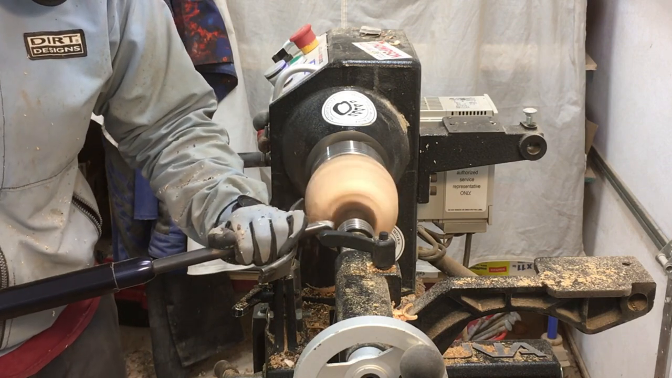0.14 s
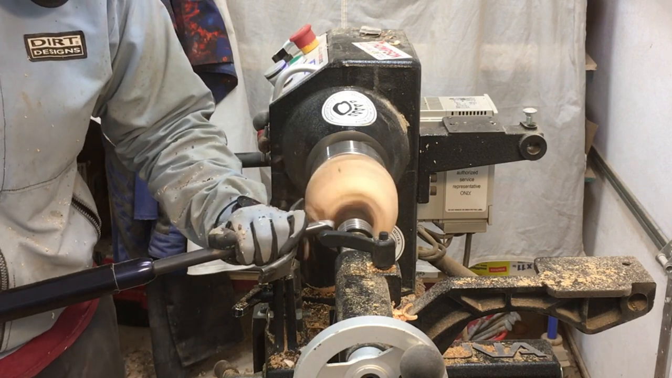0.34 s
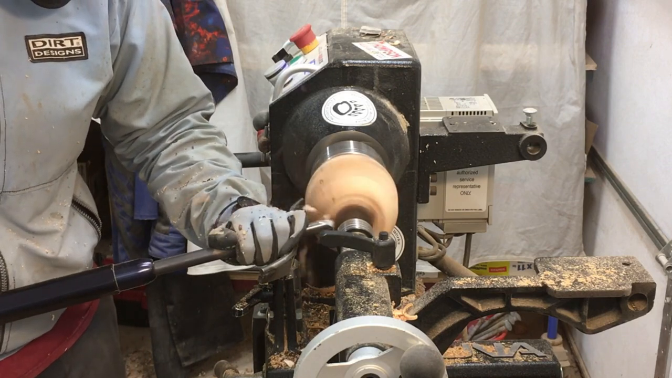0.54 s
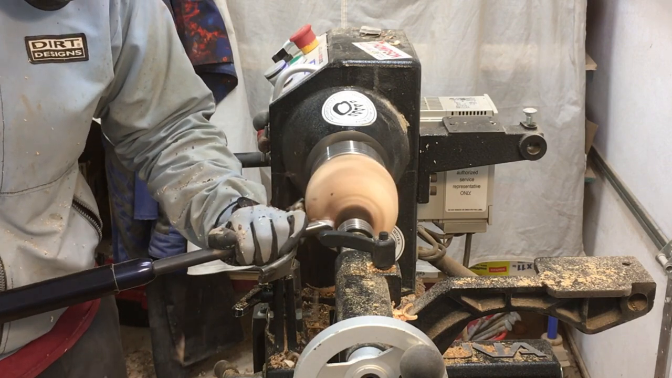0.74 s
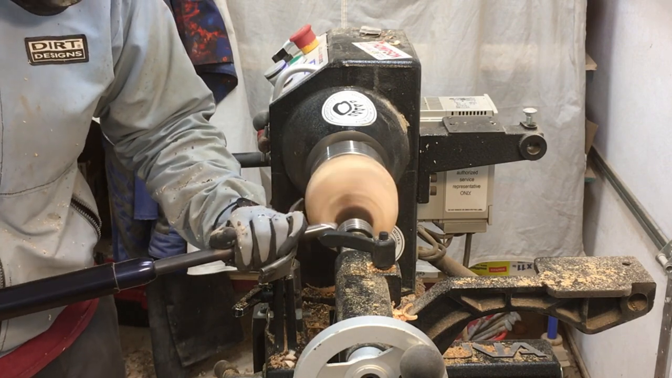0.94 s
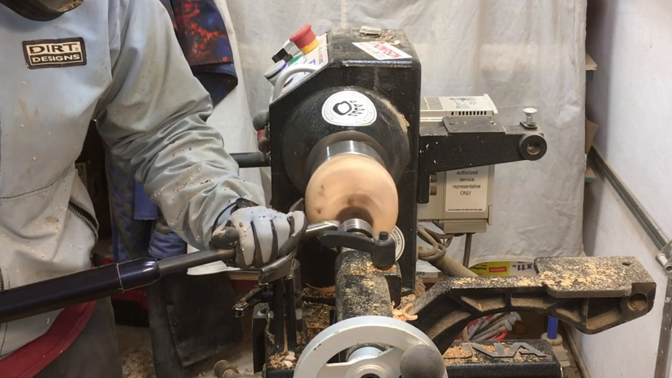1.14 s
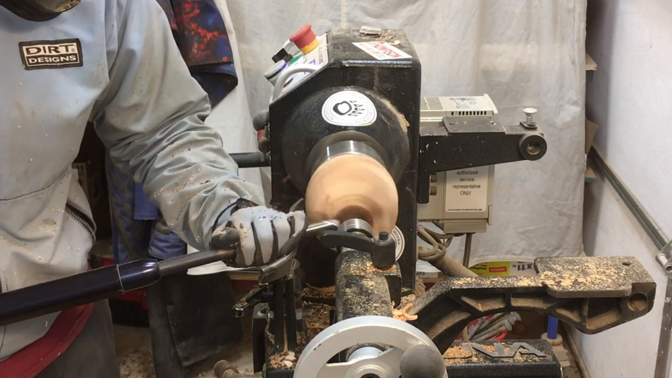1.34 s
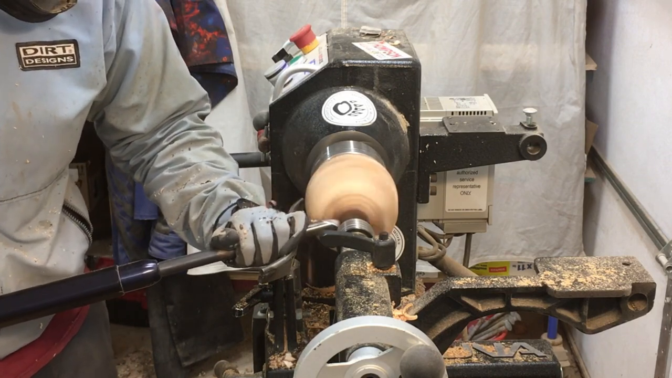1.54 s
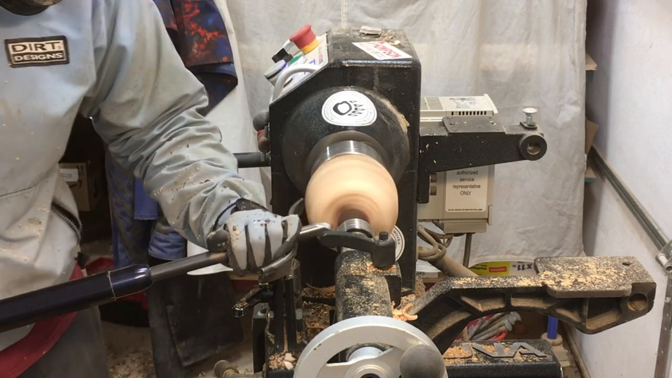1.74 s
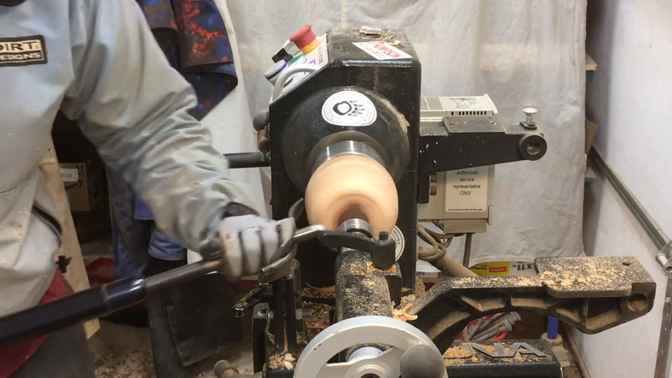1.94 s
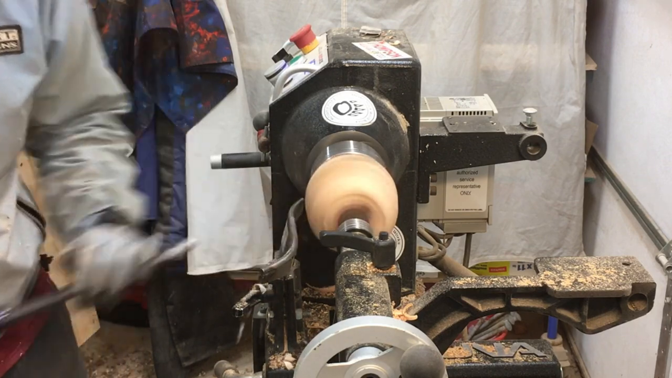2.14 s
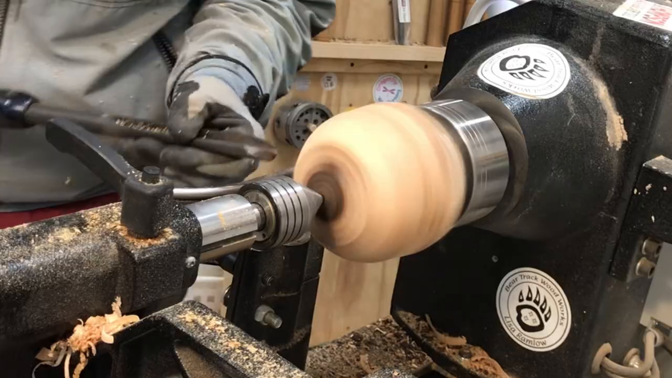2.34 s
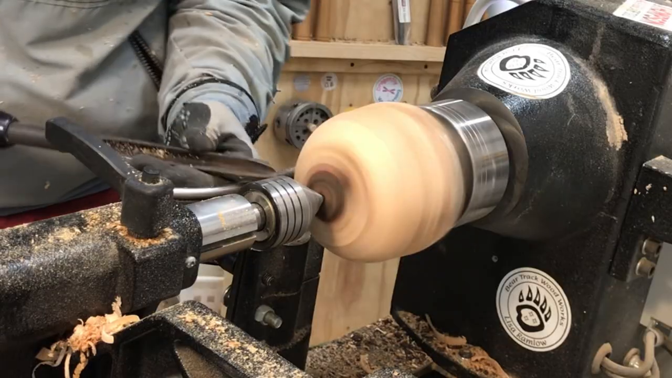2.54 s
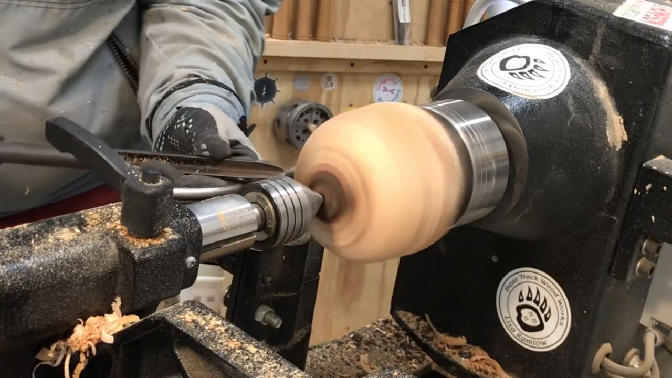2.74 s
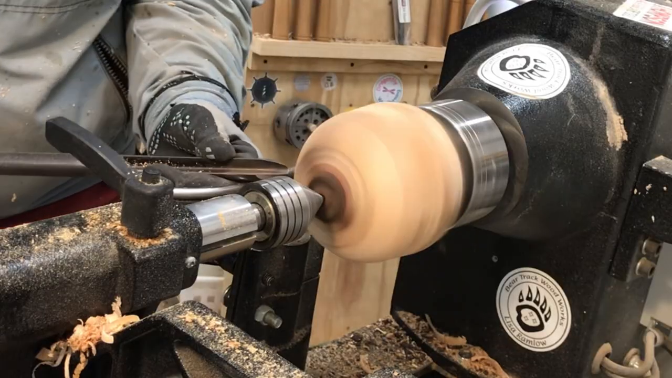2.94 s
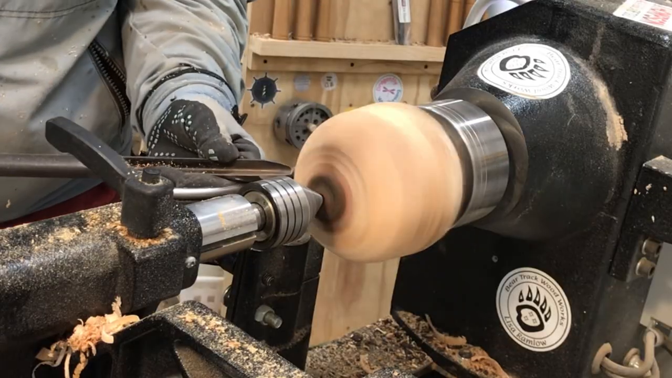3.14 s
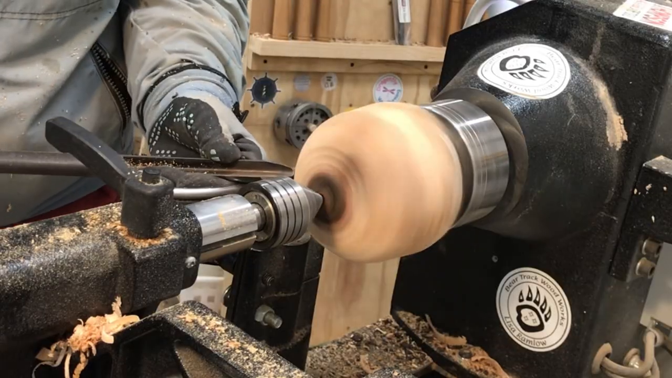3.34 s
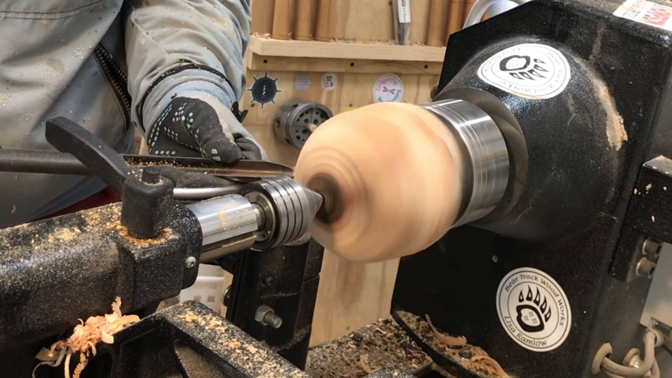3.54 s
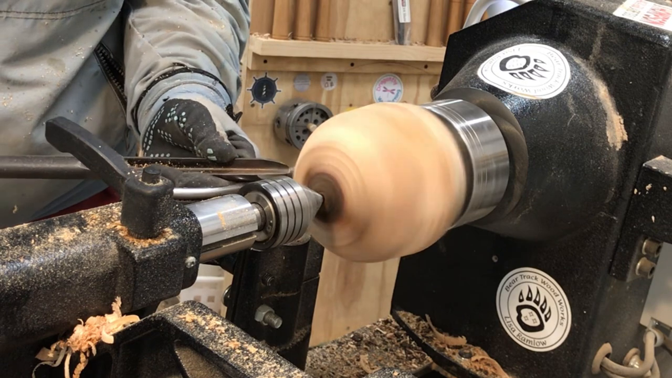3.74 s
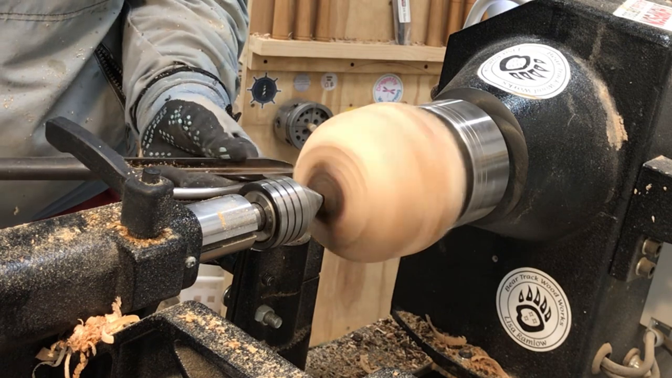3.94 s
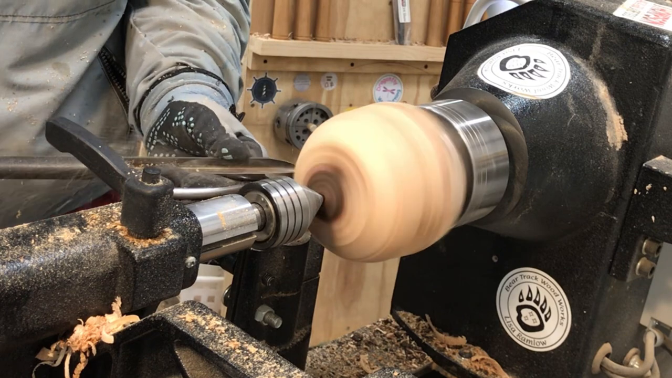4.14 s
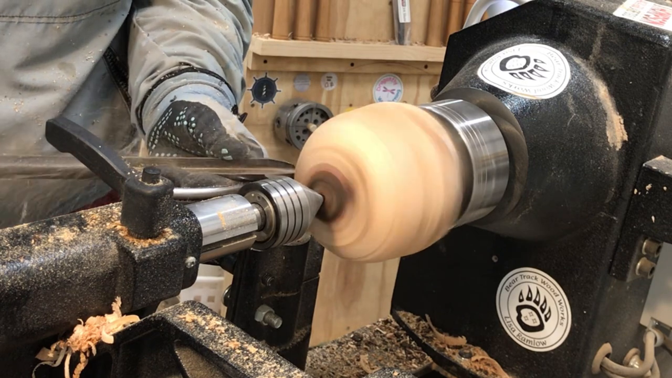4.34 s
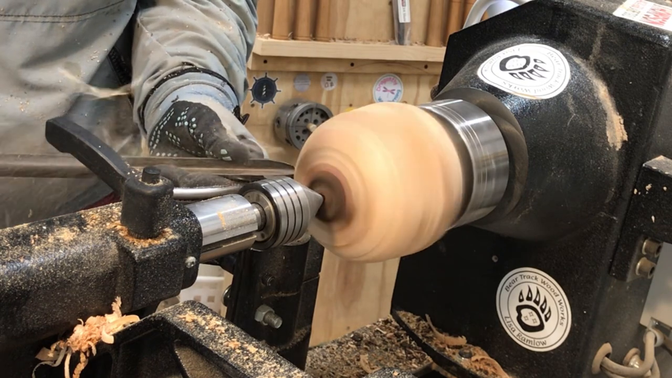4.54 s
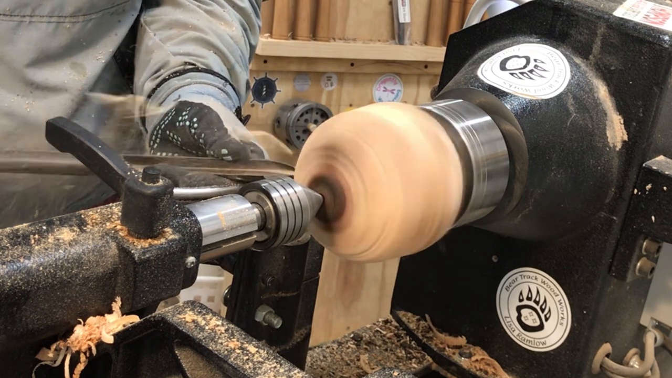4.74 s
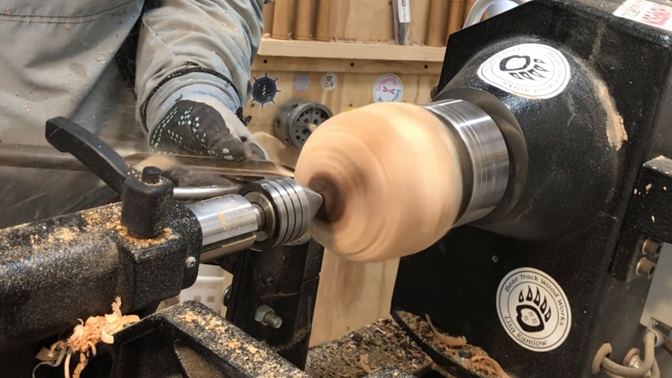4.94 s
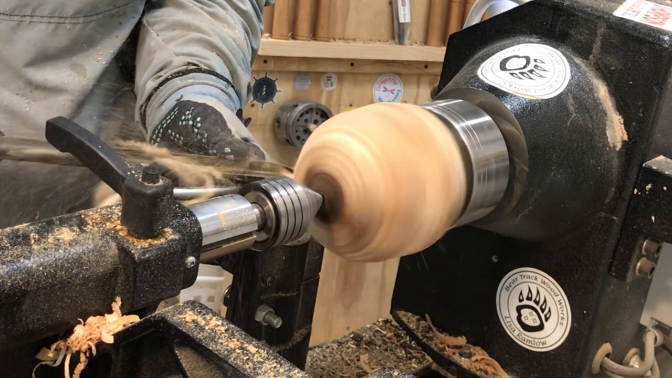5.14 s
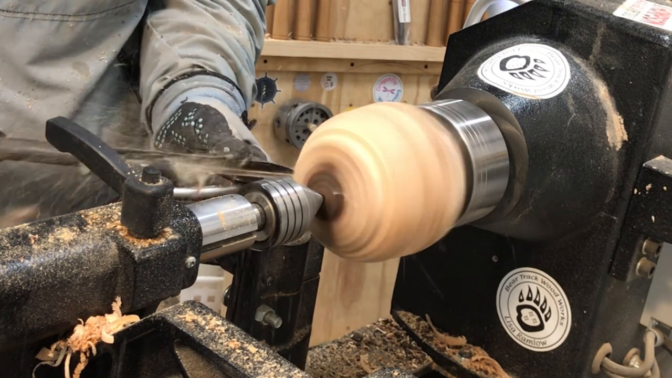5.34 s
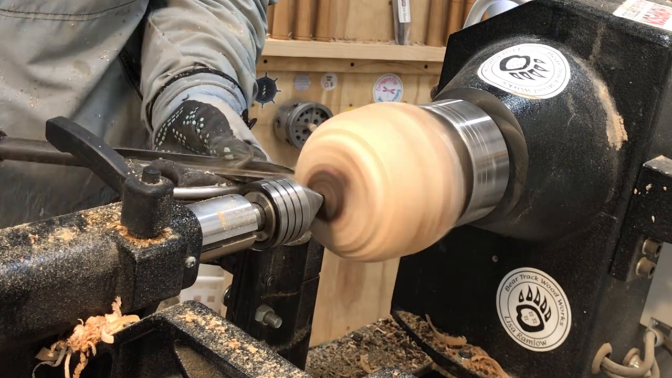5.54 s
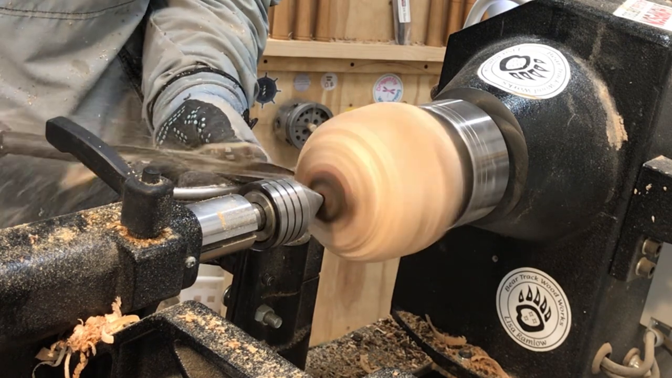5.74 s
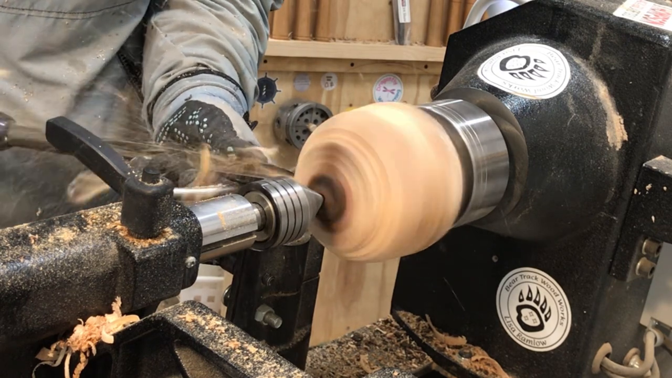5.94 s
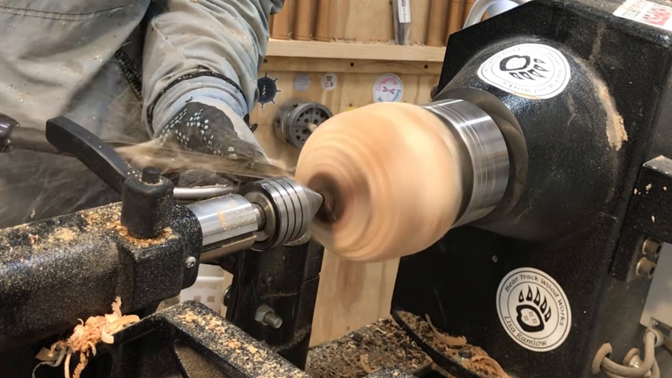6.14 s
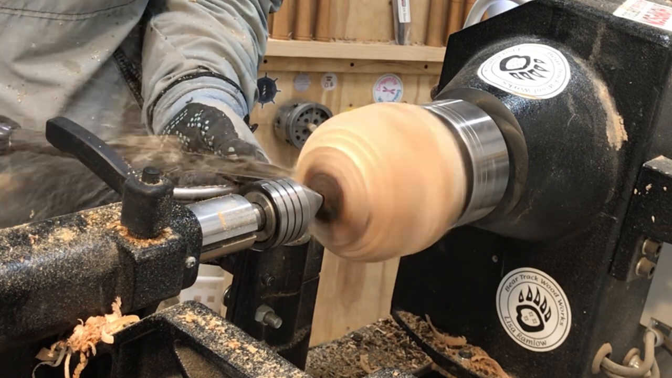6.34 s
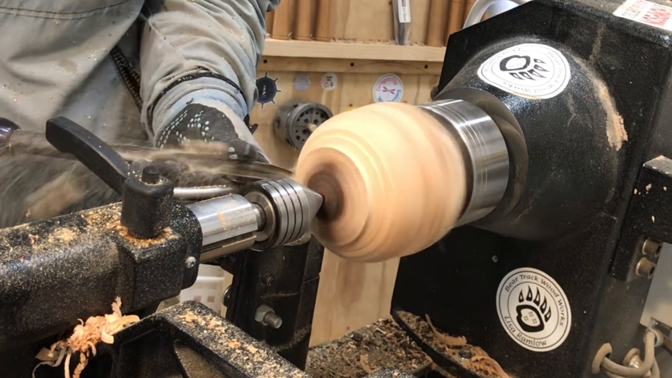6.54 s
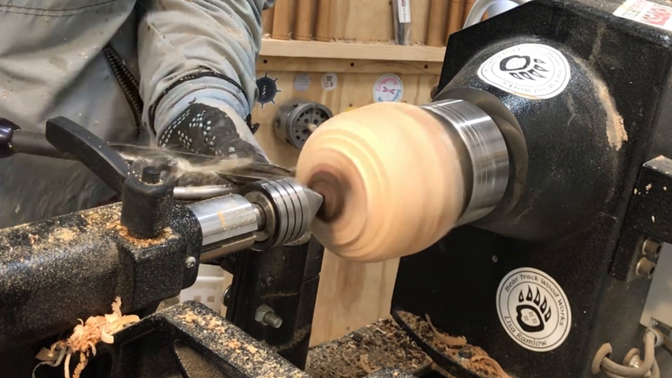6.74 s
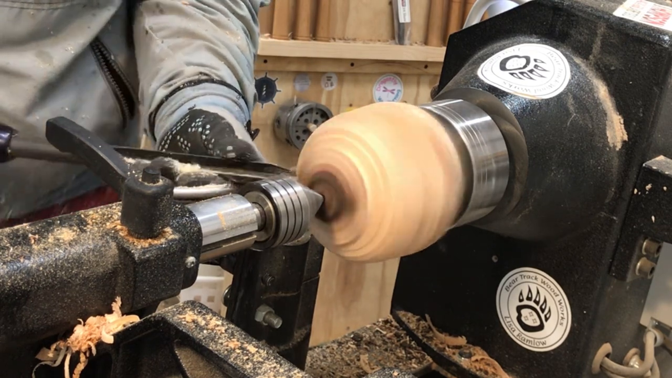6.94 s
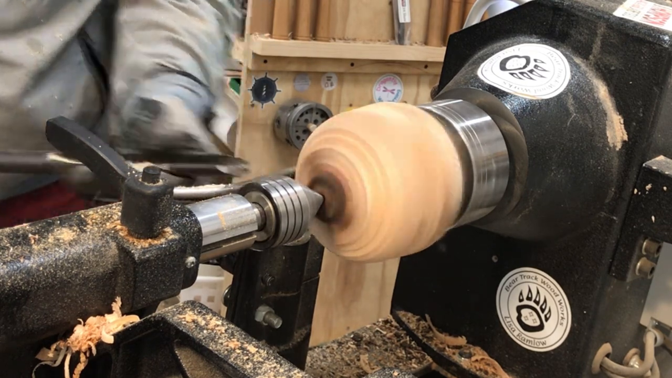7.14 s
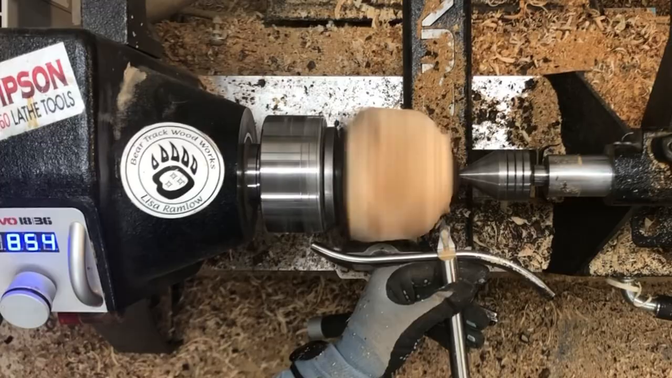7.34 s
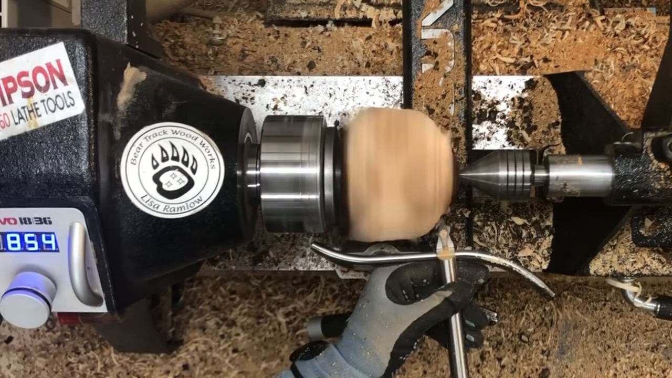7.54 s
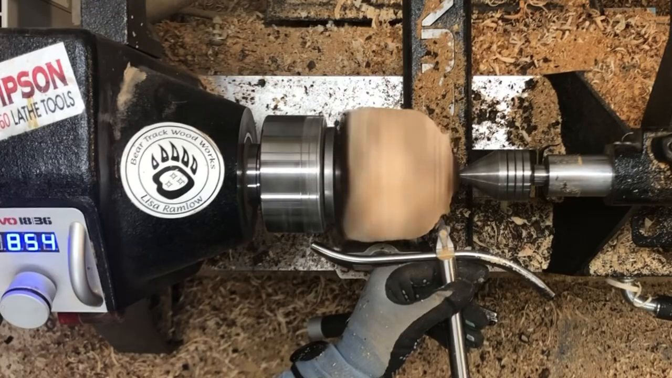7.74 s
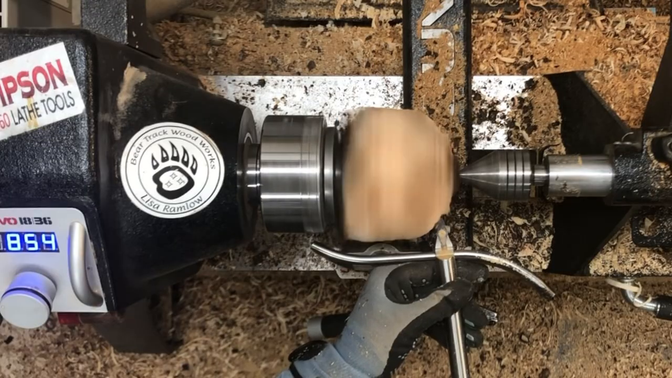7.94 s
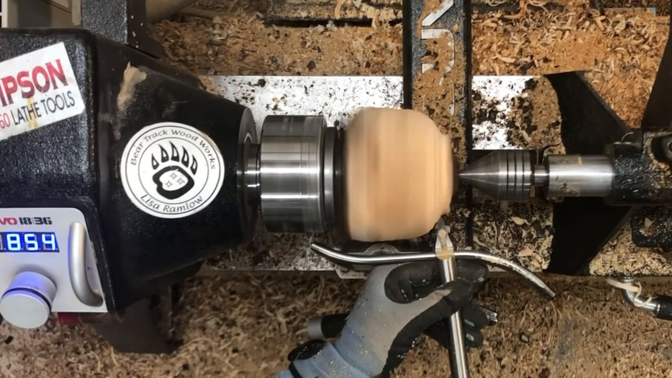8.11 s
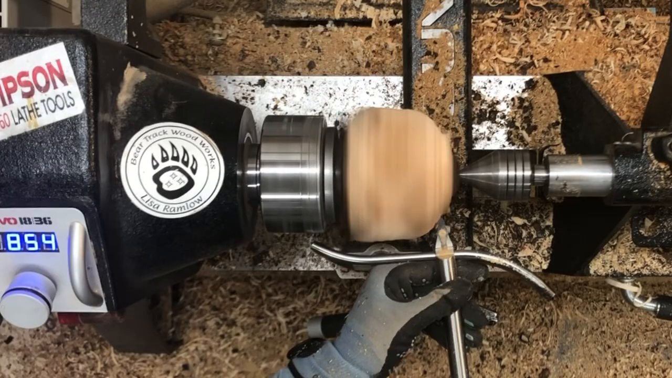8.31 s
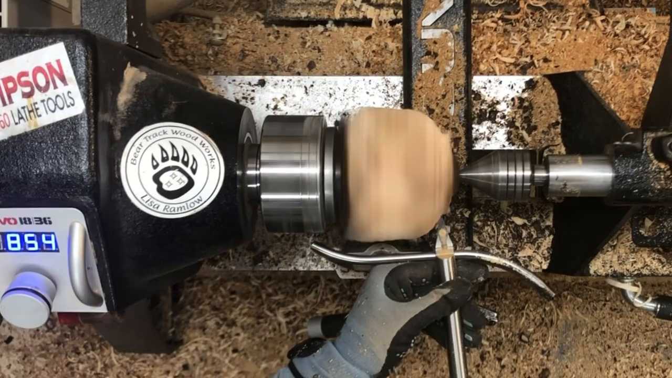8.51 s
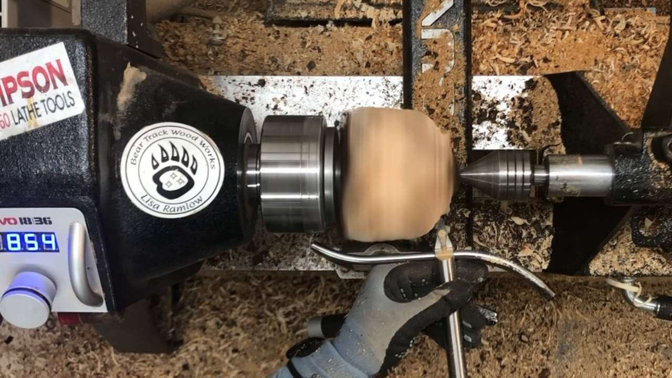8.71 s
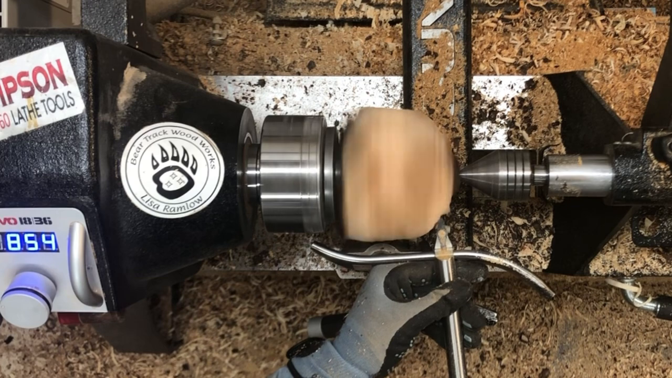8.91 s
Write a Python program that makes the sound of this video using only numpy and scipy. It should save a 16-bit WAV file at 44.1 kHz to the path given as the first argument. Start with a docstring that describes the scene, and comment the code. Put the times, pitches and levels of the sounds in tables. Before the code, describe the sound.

A gouge cuts spinning wood in dull rattling bursts, then longer hissing passes, over a softly running lathe in a workshop.

```python
"""A workshop: a wood lathe spins a small bowl blank at about 860 rpm.
A gouge meets the end grain twice a turn: tearing fibres hiss; wood, tool and lathe ring.
Two dull cuts, a knock on the tool rest, two long bright cuts, then a skim touching once a turn.
A sleeve rustles between cuts. Behind it all the motor runs and its inverter whines near 10 kHz."""
import sys
import numpy as np
from scipy import signal
from scipy.fft import rfft, irfft
from scipy.io import wavfile

SR = 44100
rng = np.random.default_rng(int(sys.argv[2]) if len(sys.argv) > 2 else 0)


def master(y):
    """Save y as 16-bit WAV."""
    cut = np.clip(np.atleast_2d(y).T, -1, 1)
    pcm = np.round(cut * 32767)  # scale
    wavfile.write(sys.argv[1], SR, pcm.astype(np.int16))


N = 395577
TAPS = 16384

# gouge feed per cut: t/s, force/dB, shaving hiss/dB
FIRST_CUT = [(0, -24, -29), (0.13, -21, -35), (0.27, -17, -35.5), (0.42, -18.5, -32), (0.56, -23, -33),
             (0.7, -30.5, -33.3), (0.78, -35.5, -36)]
SECOND_CUT = [(1.046, -26, -37), (1.085, -25, -42.5), (1.24, -23, -33), (1.33, -15.5, -36.5),
              (1.43, -19.5, -34), (1.51, -18.5, -37), (1.6, -43, -59)]
THIRD_CUT = [(4.001, -35.5, -33.5), (4.09, -30, -28.5), (4.35, -29.5, -25), (4.68, -29, -22.5),
             (4.871, -25, -18), (5.12, -23.5, -15.5), (5.291, -22.5, -17.5), (5.42, -35, -33)]
FOURTH_CUT = [(5.517, -36.5, -27.5), (5.609, -26, -20.5), (5.799, -20.5, -17), (6.1, -19, -14.5),
              (6.349, -21.5, -17.5), (6.6, -26.5, -22.5), (6.85, -28.5, -25.6), (6.97, -41.5, -33.5)]
SKIM = [(7.85, -56, -46), (7.97, -45, -45.5), (8.35, -50, -47.2), (8.65, -54.5, -49.5), (8.97, -57, -49.5)]
CUTS = [FIRST_CUT, SECOND_CUT, THIRD_CUT, FOURTH_CUT, SKIM]

def feed(entry_s=0.0004, exit_s=0.012):
    """The edge enters fast and lifts out gently: force, shaving, contact gate 0-1."""
    t = seconds()
    force_db, shaving_db = in_time([row for cut in CUTS for row in cut])
    ramps = [np.minimum((t - cut[0][0]) / entry_s, (cut[-1][0] - t) / exit_s) for cut in CUTS]
    return force_db, shaving_db, np.clip(ramps, 0, 1).sum(axis=0)


# drive at each cut's peak: headstock/dB, its slope/(dB per dB of force), bed/dB, gouge ring/dB,
# hollow wood/dB re force, rasp/dB re force
SHAKING = [(-29.5, 0.74, -37.5, -29, -12, -4.5), (-27, 1.1, -35.5, -32, -10, -7.5),
           (-26, 1.77, -35, -25, -11, -5.5), (-26.5, 0.49, -32, -21, -10.5, -4),
           (-49, 1.5, -67.5, -50.5, -11, -5)]

def cutting(turns, force_db, shaving_db, touching, uneven_db=1.0):
    """Force drives blank and headstock, depth the bed, both the steel; the shaving hisses."""
    _, top_force_db, top_shaving_db = np.transpose([np.max(cut, axis=0) for cut in CUTS])
    push_db = force_db - per_cut(top_force_db)
    depth_db = shaving_db - per_cut(top_shaving_db)
    thrum_db, thrum_slope, bed_db, ring_db, hollow_db, rasp_db = map(per_cut, np.transpose(SHAKING))
    thrum, boom, hollow, rasp, ring, hiss = touching * from_db([
        thrum_db + thrum_slope * push_db,
        bed_db + 1.14 * depth_db,
        force_db + hollow_db + uneven_db * drift(per_s=16),  # harder and softer wood
        force_db + rasp_db + uneven_db * drift(per_s=16),
        ring_db + 0.79 * (push_db + depth_db),
        shaving_db])
    seat = contact(turns, depth_db)
    jolt, wood_catch, hiss_catch = catches()
    load = bites(seat, lag_s=0.0025, extra_rub_db=0.5, stretch=1.14)
    lathe = lathe_body(turns, thrum * load, boom * load, jolt)
    wood = blank(turns, hollow * load, rasp * load, wood_catch)
    body = from_db(-5) * workshop(lathe, wet_db=-4.5) + from_db(-3.5) * workshop(wood, wet_db=-4.5)
    chips = grit(grit_db=1.1, per_s=330)
    steel = gouge_ring(ring * chips * bites(seat, lag_s=0.001) + from_db(-9) * hiss_catch)
    spray = fibre_hiss(hiss * chips * bites(seat, extra_rub_db=-3, stretch=0.93) + hiss_catch)
    return body + from_db(-0.83) * workshop(steel, wet_db=1) + from_db(-2) * workshop(spray, wet_db=-15.5)


# edge seating per cut: high spot at edge t/s, full-depth bite/turns, full-depth rub/dB,
# opposite bite at entry/dB, at exit/dB, top octave of hiss at entry/dB, at exit/dB
CONTACT = [(.755, 0.05, -4, 1.5, -17, -7, -9.5), (1.051, 0.15, -12.5, -5.5, 11.5, -9, -3),
           (4.05, 0.075, -7, -0.5, -.5, 5.5, -3.5), (5.522, .1, -10, -0.5, -19, 0, -4.5),
           (7.869, 0.024, -40, -32, -33, -8, -8)]
IDLE_TURNS_PER_S, SAG_TURNS_PER_S, DEEP_CUT_DB = 14.42, 0.555, -15

def contact(turns, depth_db):
    """Deeper cuts bite longer and rub harder; the opposite bite changes mostly late in a cut."""
    _, full_turns, full_rub_db, entry_db, exit_db, _, _ = np.transpose(CONTACT)
    late = per_cut(np.zeros(len(CUTS)), np.ones(len(CUTS))) ** 3.3
    opposite_db = per_cut(entry_db) + late * per_cut(exit_db - entry_db)
    bite_turns = per_cut(full_turns) * from_db(0.6 * depth_db)
    rub_db = per_cut(full_rub_db) + 0.45 * depth_db
    return turns, bite_turns, opposite_db, rub_db


def spindle_turns(shaving_db, touching):
    """Blank angle, whole where the high spot meets the edge; cutting power slows it."""
    turns_per_s = IDLE_TURNS_PER_S - SAG_TURNS_PER_S * touching * from_db(shaving_db - DEEP_CUT_DB) ** 2
    turns = np.cumsum(turns_per_s) / SR
    high_spots = np.interp(np.transpose(CONTACT)[0], seconds(), turns)
    return turns - per_cut(np.unwrap(2 * np.pi * (high_spots % 1)) / (2 * np.pi))


def bites(seat, lag_s=0, extra_rub_db=0, stretch=1):
    """Force of mean power 1: end grain strikes twice a turn, the bevel rubs between."""
    turns, bite_turns, opposite_db, rub_db = seat
    turns = turns - lag_s * IDLE_TURNS_PER_S
    width = np.maximum(bite_turns * stretch, 0.01)
    high, opposite = (np.exp(-0.5 * (((turns + shift) % 1 - 0.5) / width) ** 2) for shift in (0.5, 0))
    opposite_power, rub_power = from_db(opposite_db) ** 2, from_db(rub_db + extra_rub_db) ** 2
    mean_power = np.sqrt(2 * np.pi) * width * (1 + opposite_power) + rub_power
    return np.sqrt((high + opposite_power * opposite + rub_power) / mean_power)


# edge catches: t/s, headstock drive/dB, wood drive/dB, hiss drive/dB
CATCHES = [(0.054, -29, -29, -38), (0.114, -29, -14.5, -30), (0.254, -30, -33, -45),
           (.755, -46.5, -36, -37), (.922, -60, -56, -43), (.984, -36, -36.5, -39),
           (1.016, -33.5, -36, -38.5), (1.052, -27, -30, -30), (1.119, -15.5, -15.5, -24),
           (1.157, -10, -11.5, -10), (1.259, -27, -21, -28), (1.397, -17.5, -22, -32),
           (3.422, -75, -70, -53), (3.491, -43.5, -40.5, -35), (3.56, -49, -38, -30),
           (4.007, -52, -51, -30.5), (4.955, -34, -36, -16), (5.004, -46, -10.5, -34),
           (5.453, -32, -33, -21.5), (5.488, -46, -37, -31), (5.523, -39.5, -34, -36),
           (6.933, -28.5, -37, -22.5), (7.003, -48, -39, -21)]

def catches():
    """The edge catches: burst envelopes for headstock, wood and hiss."""
    at_s, thrum_db, wood_db, hiss_db = np.transpose(CATCHES)
    return (bursts(at_s, thrum_db, rise_s=0.0016, fall_s=0.016),
            bursts(at_s, wood_db, rise_s=0.00081, fall_s=0.01),
            bursts(at_s, hiss_db, rise_s=0.003, fall_s=0.0036))


# wood spectra: f/Hz, level/dB
HOLLOW = [(250, -21), (400, 0), (480, 2.5), (700, 2.5), (1100, 2), (1300, -4.5), (1700, -4.5),
          (4000, -42.5)]
RASP = [(600, -31), (1200, -9.5), (1500, 2), (1900, 0.5), (2600, 3.5), (3050, -6), (4000, -9),
        (8000, -14.5)]
# blank resonances: f/Hz, width/Hz, lift/dB
WOOD_MODES = [(510, 26, 4), (537, 24, 7), (602, 24, 6), (790, 30, 4), (829, 34, 5), (942, 30, 8),
              (1020, 34, 5), (1073, 28, 6), (1161, 30, 8), (1480, 30, 3), (1637, 34, 9), (1770, 34, 6),
              (1910, 26, 9), (2208, 38, 5), (2398, 48, 9), (2700, 90, 3)]

def blank(turns, hollow, rasp, catch):
    """Bumps knock and tearing fibres rasp through the same wood modes."""
    splinters = grit(grit_db=1.4, per_s=160)
    bumps = surface(turns, memory=0.54) * grit(grit_db=2.5, per_s=600)
    knocking = bumps * (hollow * splinters + from_db(-7.5) * catch)
    rasping = tearing(grit_db=2.5, per_s=800) * (rasp * splinters + from_db(-2.5) * catch)
    return resonate(knocking, HOLLOW, WOOD_MODES) + resonate(rasping, RASP, WOOD_MODES)


def surface(turns, memory, per_turn=1024):
    """Wood bumps passing the edge, rms 1; each turn partly repeats the last."""
    fresh = rng.standard_normal((per_turn // 4, per_turn))
    rounds = signal.lfilter([np.sqrt(1 - memory ** 2)], [1, -memory], fresh, axis=0)
    place = (turns + len(rounds) // 4) * per_turn
    bumps = np.interp(place, np.arange(rounds.size), rounds.ravel())
    return bumps / bumps.std()


# fibre spectrum: f/Hz, level/dB
FIBRES = [(2000, -29), (4500, 0), (6000, -4), (7500, 1), (10000, 2.5), (13000, 3.5), (16000, 0)]
# edge resonances: f/Hz, width/Hz, lift/dB
EDGE_MODES = [(6470, 150, 6.2), (6960, 800, 4.9), (7420, 94, 2.5), (8500, 160, 9.9), (9040, 200, 5.8),
              (11100, 370, 3.5), (13200, 390, 4.3), (14200, 370, 4.5)]

def fibre_hiss(force, top_hz=10500):
    """Torn fibres hiss and chips crackle; thin shavings are brighter in the top octave."""
    fibres = near_echoes(resonate(tearing(grit_db=2.5, per_s=1700) * force, FIBRES, EDGE_MODES))
    top = signal.fftconvolve(fibres, signal.firwin(15, top_hz, fs=SR, pass_zero=False), mode="same")
    *_, entry_db, exit_db = np.transpose(CONTACT)
    top_gain = from_db(per_cut(entry_db, exit_db))
    spray = (fibres + (top_gain - 1) * top) / np.sqrt((1 + top_gain ** 2) / 2)
    return spray + from_db(-10.5) * crackle(force)


def crackle(force, per_s=2000, t60_cycles=25, pitches=14):
    """Chips snap off at random, each ringing briefly at its own pitch."""
    snaps = (rng.random(N) < per_s / SR) * rng.standard_normal(N)
    pitch_index, out = rng.integers(0, pitches, N), 0
    for k, hz in enumerate(np.geomspace(5000, 15000, pitches)):
        radius = from_db(-60 * hz / (t60_cycles * SR))
        gain = np.sqrt((1 - radius ** 2) / 2)
        poles = [1, -2 * radius * np.cos(2 * np.pi * hz / SR), radius ** 2]
        out += signal.lfilter([gain, 0, -gain], poles, snaps * force * (pitch_index == k) + 1e-18)
    return out / snaps.std()


# gouge spectrum: f/Hz, level/dB
GOUGE = [(2000, -22), (3000, -2), (3600, -0.5), (4500, 0), (5200, -2), (5800, -2.5), (8000, -27)]
# gouge resonances: f/Hz, width/Hz, lift/dB
GOUGE_MODES = [(3290, 28, 8), (3430, 60, 4), (4340, 120, 7), (4752, 130, 7), (4880, 160, 6), (5060, 120, 3)]

def gouge_ring(force):
    """Tearing fibres set the steel gouge ringing."""
    return resonate(tearing(grit_db=5, per_s=900) * force, GOUGE, GOUGE_MODES)


# lathe spectra: f/Hz, level/dB
BED = [(30, -59), (60, -28), (105, -14), (135, 2.5), (200, -3.5), (235, -5), (300, -19.5), (600, -61)]
HEADSTOCK = [(100, -48.5), (235, -9), (270, 2.5), (310, 6), (410, -4), (520, -41), (1000, -30.5)]
# lathe resonances: f/Hz, width/Hz, lift/dB
BED_MODES = [(146.7, 8.9, 6.5), (157.7, 4, 3.5), (158, 8.6, 0.5), (215, 150, 1)]
SPINDLE_MODES = [(293.8, 8.3, 14.1), (314.7, 38, 18.4), (365, 48, 3.7), (419, 18.5, 14.7)]

def lathe_body(turns, thrum, boom, jolt):
    """The cut shakes bed and spindle, nearly alike on every turn."""
    bumps = surface(turns, memory=0.845)
    bed = resonate(bumps * (boom + from_db(-17.5) * jolt), BED, BED_MODES)
    spindle = resonate(bumps * (thrum + jolt), HEADSTOCK, SPINDLE_MODES)
    return bed + from_db(-2.5) * spindle


# steel set on the tool rest: t/s, strike/dB
KNOCKS = [(1.8, -58), (1.892, -49.5), (1.997, -41.5), (2.597, -24.5), (7.089, -37)]
# crack spectrum: f/Hz, level/dB
REST_CRACK = [(60, -36), (200, -7), (400, -9), (700, -1), (1500, 0.5), (2600, -2.5), (4800, -1), (5800, -8),
              (7200, -8), (8500, -18), (16000, -30)]
# rest modes: f/Hz, level/dB, t60/s
REST_MODES = [(720, -7.5, 0.43), (1155, -4.5, 0.4), (1550, -5, 0.3), (2480, 7.5, 0.081), (2570, -1, 0.1),
              (3210, 4, 0.084), (3560, -15, 0.14), (4340, -3, 0.12), (5030, -18, 0.18), (4640, -17, 0.098),
              (5200, -11, 0.074), (6960, -6, 0.13), (7150, -18, 0.12)]

def tool_rest():
    """The tool strikes its rest: the crack, and the ring after it."""
    at_s, strike_db = np.transpose(KNOCKS)
    impacts = bursts(at_s, strike_db, rise_s=0.00037, fall_s=0.0097)
    crack = resonate(rng.standard_normal(N) * impacts, REST_CRACK)
    t, strikes = np.arange(TAPS) / SR, np.zeros(N)
    strikes[(at_s * SR).astype(int)] = from_db(strike_db)
    chime = sum(from_db(db - 60 * t / t60_s) * np.sin(2 * np.pi * (hz * t + rng.random()))
                for hz, db, t60_s in REST_MODES)
    return from_db(-1) * crack, from_db(-11.5) * signal.fftconvolve(strikes, chime)[:N]


# grip changes: start/s, end/s, peak/dB
GRIP_CHANGES = [(1.66, 2.36, -54), (7.07, 7.34, -51.5)]
# cloth spectrum: f/Hz, level/dB
CLOTH = [(200, 2), (1000, -5), (2000, 2.5), (4000, 2.5), (7000, -2), (10000, -14), (16000, -7)]

def sleeve():
    """Sleeve and glove rustle in one arc per change of grip."""
    envelope = np.zeros(N)
    for start_s, end_s, db in GRIP_CHANGES:
        progress = np.clip((seconds() - start_s) / (end_s - start_s), 0, 1)
        envelope += from_db(db) * np.maximum(np.sin(np.pi * progress), 0) ** 0.35
    return envelope * resonate(tearing(grit_db=0, per_s=190), CLOTH)


# motor, belt and bearing spectrum: f/Hz, level/dB
RUNNING = [(18, -51.5), (30, -17), (158, -1.5), (243, -7.5), (316, -2.5), (347, -4.5), (614, 0.5),
           (725, -2.5), (798, -2.5), (1630, -7), (2220, -8.5), (2680, -16.5), (3020, -9), (4310, -23.5),
           (8800, -16), (11400, -46), (19400, -120)]
# motor tones: f/Hz, rms/dB
MOTOR_TONES = [(132, -72), (146, -68), (316, -68), (619, -70.5), (780.6, -69), (1047, -69.5), (1098, -68.5),
               (1410, -73.5), (2148, -71), (3110, -75.5), (8651, -73)]

def motor(turns, running_db=-55.5, mains_on_s=7.33):
    """Bearing noise swells each turn over steady tones; mains hum enters late."""
    swell = from_db(running_db + 0.45 * np.cos(2 * np.pi * turns))
    running = swell * resonate(rng.standard_normal(N), RUNNING)
    hum = sum(tone(hz, db, waver_rad=0.26) for hz, db in MOTOR_TONES)
    mains = tone(hz=59.5, db=-69.5) * np.clip((seconds() - mains_on_s) / 0.03, 0, 1)
    return running + hum + mains


# carrier sidebands: offset/drive frequencies, level/dB
SIDEBANDS = [(-21, -71), (-19, -70), (-17, -70), (-15, -74), (-13, -71), (-11, -72), (-9, -72), (-5.5, -69),
             (-3, -53), (-1, -60), (0, -68), (1, -63), (3, -58), (5, -67), (6, -69), (9, -70), (11, -67),
             (13, -69), (15, -67), (17, -68), (21, -70), (25, -77)]
# switching noise spectrum: f/Hz, level/dB
DRIVE_HISS = [(7000, -14.5), (8700, -31), (9500, -18), (10100, -5), (10700, -1), (11200, -17),
              (11800, -7.5), (12600, -22), (14000, -18), (15300, -9), (16000, -39)]

def inverter(carrier_hz=10000, drive_hz=34.5):
    """Switching whine; inner sidebands stay in step, so it throbs twice per drive cycle."""
    whine = sum(tone(carrier_hz + k * drive_hz, db, scatter_cycles=min((k / 10) ** 2, 1))
                for k, db in SIDEBANDS)
    throb = from_db(2 * np.cos(4 * np.pi * drive_hz * seconds()))
    fizz = resonate(throb * rng.standard_normal(N), DRIVE_HISS)
    return from_db(-0.16) * whine + from_db(-60) * fizz


# echoes off blank, rest and headstock: delay/s, level/dB
NEAR_ECHOES = [(.00052, -17), (.00135, -22), (.0023, -9.5), (.0037, -31)]

def near_echoes(x):
    """Nearby hard surfaces comb the hiss; power is kept."""
    echoes = sum(from_db(db) * np.pad(x, (round(delay_s * SR), 0))[:N] for delay_s, db in NEAR_ECHOES)
    return (x + echoes) / np.sqrt(1 + sum(from_db(db) ** 2 for _, db in NEAR_ECHOES))


# room decay: f/Hz, t60/s
ROOM_T60 = [(125, 0.49), (400, 0.57), (1200, 0.47), (3500, 0.33), (8000, 0.33), (15000, 0.63)]

def workshop(x, wet_db):
    """Direct sound plus a diffuse tail decaying band by band; power is kept."""
    t, hz = np.arange(TAPS * 2) / SR, np.arange(TAPS + 1) * SR / (TAPS * 2)
    white = rfft(rng.standard_normal(len(t)))
    centres_hz, t60s = np.transpose(ROOM_T60)
    bands = [irfft(white * np.interp(hz, centres_hz, share)) for share in np.eye(len(t60s))]
    tail = sum(band * from_db(-60 * t / t60_s) for band, t60_s in zip(bands, t60s))
    tail *= np.clip((t - 0.003) / 0.00088, 0, 1)
    wet = from_db(wet_db)
    return (x + wet * signal.fftconvolve(x, tail / np.linalg.norm(tail))[:N]) / np.hypot(1, wet)


def resonate(x, colour, modes=()):
    """Minimum-phase filter of unit power: broad spectrum plus resonances."""
    hz = np.arange(TAPS // 2 + 1) * SR / TAPS
    colour_hz, colour_db = np.transpose(colour)
    broad = from_db(np.interp(np.log(hz + 1), np.log(colour_hz), colour_db))
    lift = 1 + sum((from_db(db) ** 2 - 1) / (1 + (2 * (hz - mode_hz) / width_hz) ** 2) ** 2
                   for mode_hz, width_hz, db in modes)
    cepstrum = irfft(np.log(broad * np.sqrt(lift)))
    response = irfft(np.exp(rfft(2 * cepstrum * (np.arange(TAPS) < TAPS // 2))))
    return signal.fftconvolve(x, response / np.linalg.norm(response))[:N]


def grit(grit_db, per_s):
    """Fibres snap in uneven clumps: random gain of mean power 1."""
    gain = from_db(grit_db * np.minimum(drift(per_s), 2.5))
    return gain / np.sqrt(np.mean(gain ** 2))


def tearing(grit_db, per_s):
    """Gritty noise, rms 1."""
    return rng.standard_normal(N) * grit(grit_db, per_s)


def bursts(times_s, levels_db, rise_s, fall_s):
    """Envelope of brief contacts."""
    out, t = np.zeros(N), np.arange(TAPS // 2) / SR
    shape = np.minimum(t / rise_s, 1) ** 2 * np.exp(-np.maximum(t - rise_s, 0) / fall_s)
    for peak_s, db in zip(times_s, levels_db):
        start = int((peak_s - rise_s) * SR)
        out[start:start + len(t)] += from_db(db) * shape
    return out


def tone(hz, db, waver_rad=0.2, scatter_cycles=1):
    """Sine with a random, wandering phase."""
    cycles = hz * seconds() + scatter_cycles * rng.random()
    return np.sqrt(2) * from_db(db) * np.sin(2 * np.pi * cycles + waver_rad * drift(per_s=2.32))


def drift(per_s):
    """Random wander, spread 1."""
    knots = rng.standard_normal(N // 8)
    return np.interp(seconds() * per_s, np.arange(len(knots)), knots) * np.sqrt(3 / 2)


def per_cut(entry, leaving=None):
    """One value per cut, held or gliding from entry to exit."""
    edges_s = [(cut[0][0], cut[-1][0]) for cut in CUTS]
    values = np.column_stack([entry, entry if leaving is None else leaving])
    return np.interp(seconds(), np.ravel(edges_s), values.ravel())


def in_time(rows):
    """Table columns, linearly interpolated over time."""
    times_s, *columns = np.transpose(rows)
    return [np.interp(seconds(), times_s, column) for column in columns]


def from_db(db):
    """Decibels to gain."""
    return 10 ** (np.asarray(db) / 20)


def seconds():
    """Sample times."""
    return np.arange(N) / SR


def scene():
    """All sources mixed together."""
    force_db, shaving_db, touching = feed()
    turns = spindle_turns(shaving_db, touching)
    cuts = cutting(turns, force_db, shaving_db, touching)
    crack, ringing = tool_rest()
    handling = workshop(crack + sleeve(), wet_db=-1) + ringing
    return (cuts + handling + motor(turns) + inverter())[None]


def record(dry, low_cut_hz=38, high_cut_hz=15870):
    """Bass cut, soft-rounded peaks, steep top cut."""
    lean = signal.sosfilt(signal.butter(2, low_cut_hz, "high", fs=SR, output="sos"), dry)
    rounded = 1.2 * np.tanh(lean / 1.2)
    return signal.fftconvolve(rounded, signal.firwin(401, high_cut_hz, fs=SR)[None], mode="same")


dry = scene()
out = record(dry)
master(out)
```